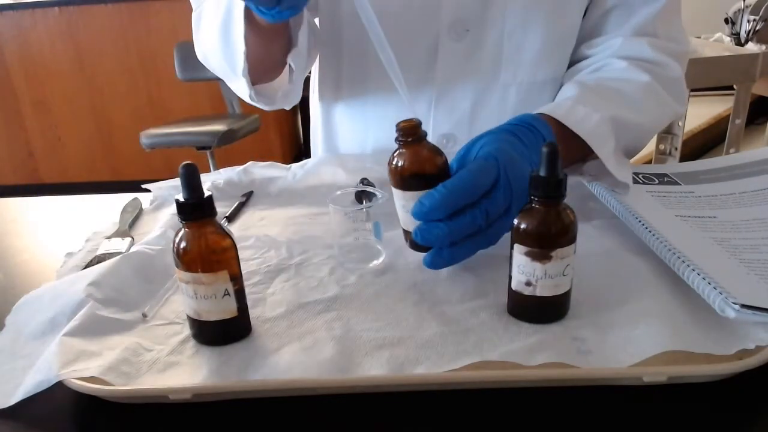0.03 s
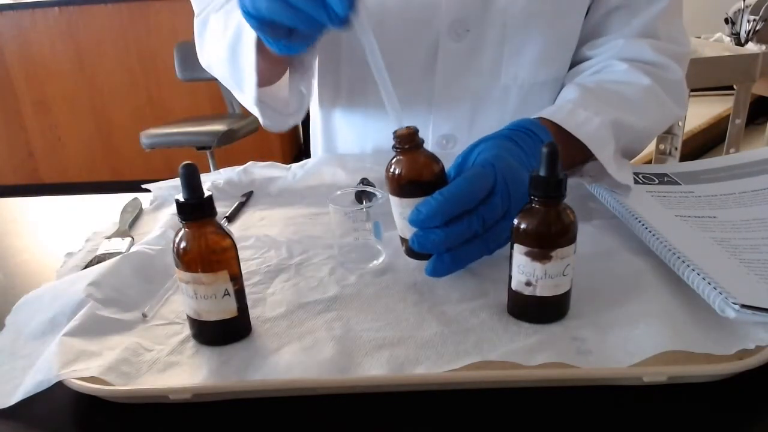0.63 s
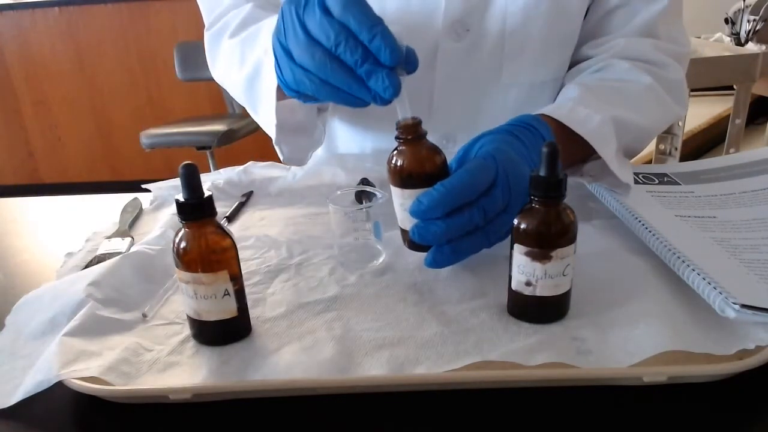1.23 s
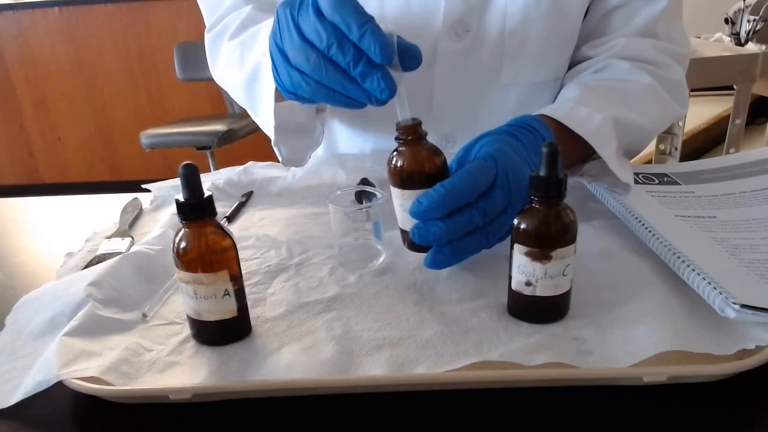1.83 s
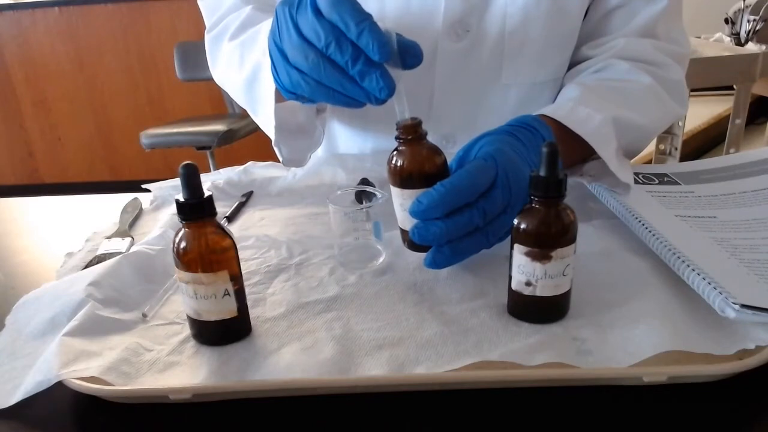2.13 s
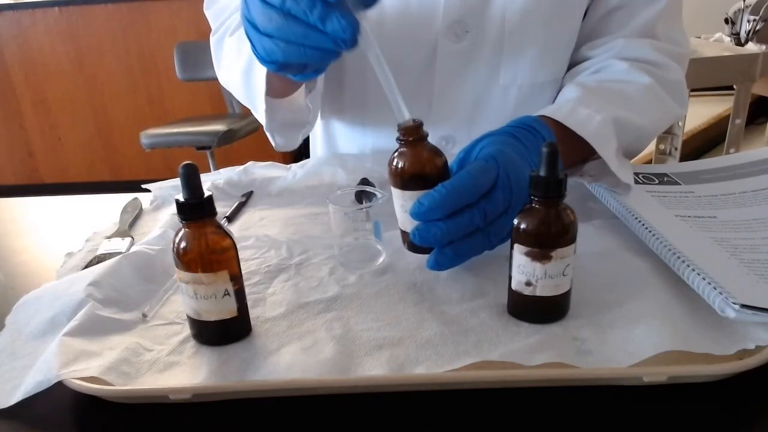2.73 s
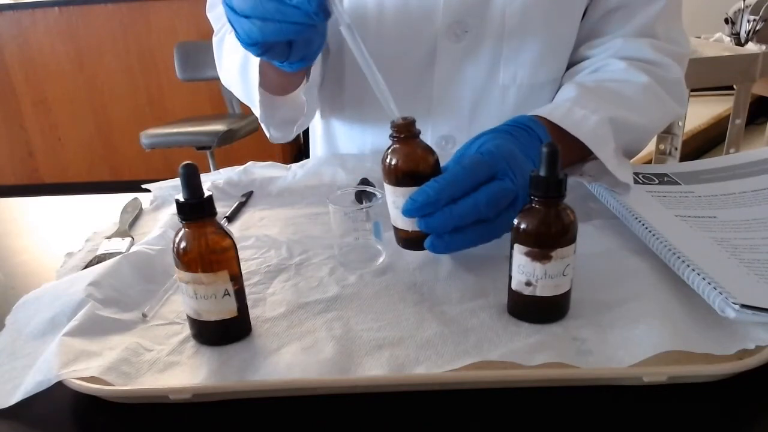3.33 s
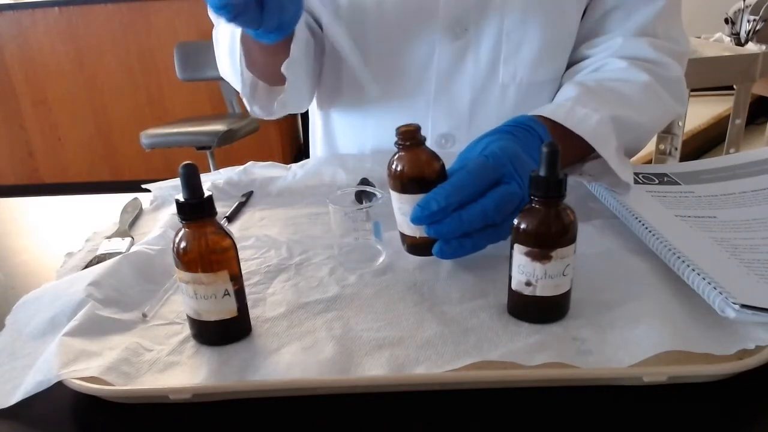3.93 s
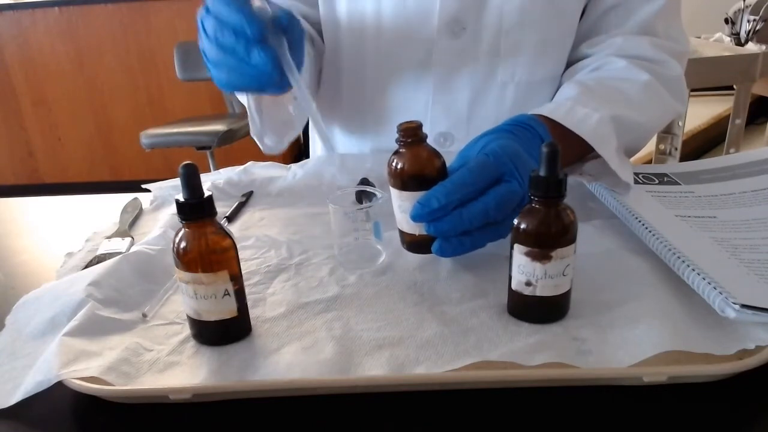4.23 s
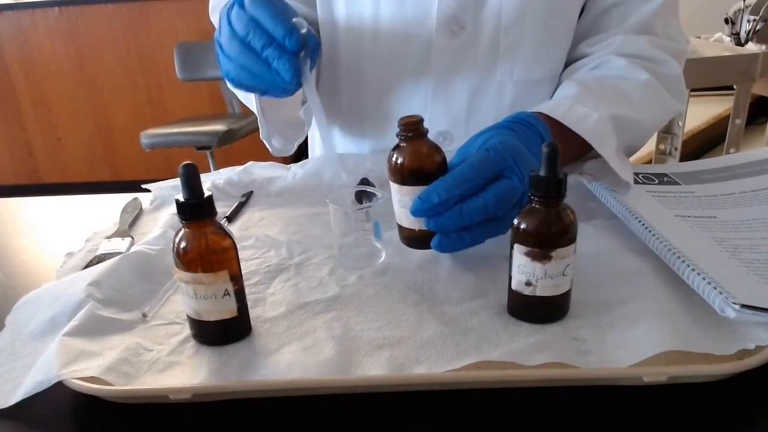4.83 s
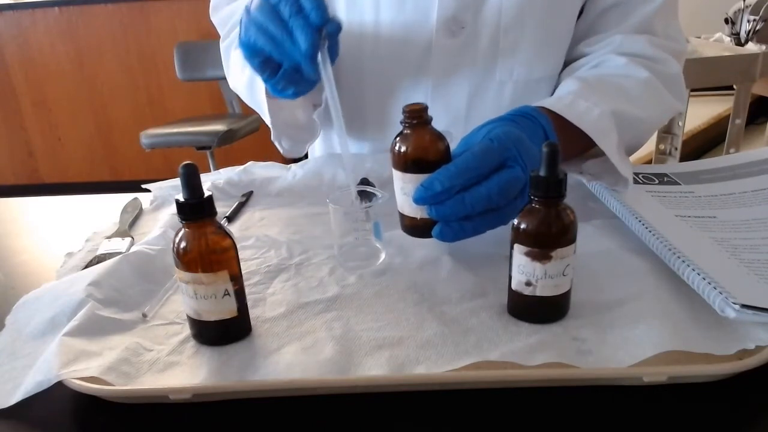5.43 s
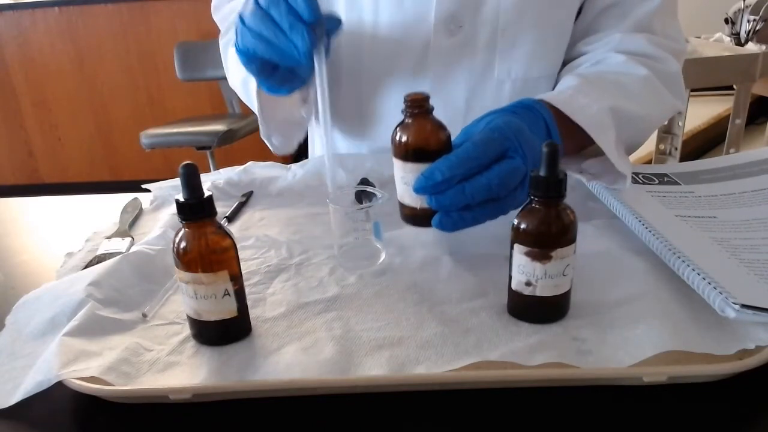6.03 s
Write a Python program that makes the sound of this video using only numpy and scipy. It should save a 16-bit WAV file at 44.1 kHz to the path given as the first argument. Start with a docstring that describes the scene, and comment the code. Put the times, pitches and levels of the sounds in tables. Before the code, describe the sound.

Ventilation rumbles steadily in a lab, with a soft rush of air. Close to the microphone, a plastic pipette makes small, dry, irregular ticks against a glass bottle and beaker, while rubber gloves and sleeves rustle faintly. A few short, hissy scrapes come from farther away and linger slightly in the room. About two thirds through, one light tap rings the glass, followed by another scrape and a few more ticks.

```python
"""Pipetting in a ventilated lab.

A gloved hand works a plastic pipette between a glass dropper bottle and a small beaker.
Ducts rumble, gloves and sleeves rustle faintly, the pipette ticks, one tap rings the glass.
Farther off something is scraped in short hissy strokes, which the room prolongs."""
import sys
import numpy as np
from scipy import signal
from scipy.fft import rfft, irfft, next_fast_len
from scipy.io import wavfile
from scipy.ndimage import map_coordinates

SR = 44100
rng = np.random.default_rng(int(sys.argv[2]) if len(sys.argv) > 2 else 0)


def generate_wav(signal):
    """Clip the signal to [-1, 1] and save it as 16-bit WAV at the path in sys.argv[1]."""
    frames = np.transpose(np.atleast_2d(signal))
    scaled = np.clip(frames, -1, 1) * 32767
    pcm = np.round(scaled).astype(np.int16)
    wavfile.write(sys.argv[1], SR, pcm)


N = 273420

# duct rumble spectrum: freq_hz, relative_db
DUCT_SPECTRUM = [(8, -24.5), (15, -9), (26, 6.5), (42, -2.5), (52, -9.5), (68, -0.5), (85, -3), (103, 1),
                 (148, -4.5), (168, -1.5), (210, -7), (255, -13), (290, -13.5), (420, -62)]
# rushing air spectrum: freq_hz, relative_db
AIR_SPECTRUM = [(150, -5), (300, 1.5), (360, 3), (420, -1.5), (640, -1.5), (820, -6), (1050, -7),
                (1400, -14.5), (2000, -21.5), (2800, -29.5), (3500, -32), (4800, -39), (6200, -41.5),
                (7600, -65), (9000, -84.5)]
# duct resonances: pitch_hz, width_hz, rms_db
DUCT_MODES = [(191, 10.1, -48.5), (231.9, 9.8, -56), (325.5, 20, -54)]
# fan tones: pitch_hz, rms_db
FAN_TONES = [(477, -62.5), (806, -72)]
# glove and sleeve rubs: peak_s, length_s, relative_db
HAND_RUBS = [(.61, 0.17, -77), (1.222, 0.13, -78.5), (2.11, 0.14, -74), (2.7, 0.17, -76),
             (2.863, 0.18, -71), (2.929, .03, -73), (3.17, 0.1, -72.5), (3.517, .24, -72.5),
             (3.913, .22, -77.5), (4.682, 0.075, -77.5), (5.52, .16, -76.5)]
# rustle spectrum: freq_hz, relative_db
RUSTLE_SPECTRUM = [(600, -17.5), (1500, 1.5), (2500, 5.5), (4000, 3), (6000, -2), (8000, -5.5),
                   (9000, -31.5)]
# light strokes: start_s, length_s, relative_db, squeak_db, squeak_hz
LIGHT_STROKES = [(0.099, .03, -71, -79, 6900), (0.128, 0.024, -76, -68, 3320),
                 (0.187, 0.031, -74.5, -82, 5150), (1.613, 0.028, -73, -75, 5220),
                 (4.265, 0.029, -71.5, -82, 7000)]
# pressed strokes: start_s, length_s, rise_s, rasp_db, rasp_hz, whistle_db, whistle_hz, hiss_db, squeal_db
PRESSED_STROKES = [(1.632, 0.036, 0.011, -62.5, 1720, -71, 3270, -67.5, -69.5),
                   (2.447, 0.017, .007, -68.5, 1600, -61, 3300, -66, -81),
                   (2.464, 0.0083, .003, -56.5, 1560, -56, 3040, -61.5, -72),
                   (2.469, 0.02, .003, -63, 1560, -66, 3150, -62.5, -66),
                   (3.352, 0.017, .002, -65, 1740, -65.5, 3120, -62, -72),
                   (3.369, 0.013, .004, -65, 2210, -67, 3100, -69, -70),
                   (3.396, 0.046, .007, -73, 2210, -75, 3020, -74, -84),
                   (4.525, 0.023, .004, -58.5, 1480, -62, 3200, -60.5, -74)]
# scraped object, light touch: pitch_hz, width_hz, gain_db
SKIM_MODES = [(1640, 310, 11), (3365, 180, 5), (4200, 300, -5), (5110, 300, -2.5), (5650, 370, -8),
              (7030, 360, -4)]
# scraped object under pressure, low range: pitch_hz, width_hz, gain_db
RASP_MODES = [(2240, 440, -9)]
# scraped object under pressure, high range: pitch_hz, width_hz, gain_db
HISS_MODES = [(4000, 620, 0), (5080, 440, 1), (5700, 450, 1.5), (6340, 410, -3.5), (7020, 380, -2.5)]
# pipette contacts: start_s, level_db, pitch_hz, t60_s, crackle_relative_db
PIPETTE_TICKS = [(0.6845, -52.5, 5000, 0.0042, -22), (1.190, -62, 6100, 0.008, -19),
                 (1.197, -66, 5800, .01, -19), (1.251, -62, 6100, .007, -13), (1.259, -67, 5700, .007, -15),
                 (1.325, -50, 5550, .005, -20), (2.8385, -54, 4580, 0.013, -16),
                 (2.8723, -52, 4700, .004, -13), (2.9242, -54.5, 5970, .008, -7.5),
                 (3.0492, -53, 5500, 0.0026, -24), (3.157, -62, 4200, .011, -15),
                 (3.5135, -68, 4650, 0.012, -13), (5.015, -61.5, 6580, 0.041, -17),
                 (5.502, -61, 3900, 0.011, -16), (5.626, -61, 6570, .009, -16),
                 (5.628, -55, 4950, .015, -25), (5.647, -60, 6750, .015, -24)]
# taps on glass: start_s, level_db
GLASS_TAPS = [(4.3225, -49)]
# glass resonances: pitch_hz, gain_db, t60_s
GLASS_MODES = [(3048, -1, 0.21), (5510, 1.5, 0.028), (5700, -4, 0.017), (5850, 2, 0.011), (6700, 8, 0.0053),
               (7200, -13, 0.067)]
# lab reverberation: freq_hz, t60_s
ROOM_DECAY = [(300, 0.68), (1600, 0.82), (3000, 0.48), (6500, 0.47), (8000, 0.13)]

TOP_HZ, LEAK_DB = 7650, -19  # band limit, gain above it


def amp(db):
    """Decibels to gain."""
    return 10 ** (np.asarray(db) / 20)


def unit_rms(x):
    """Scale to rms 1."""
    return x / np.sqrt(np.mean(x ** 2) + 1e-20)


def curve(points, hz):
    """Interpolate (freq_hz, value) points on a log frequency axis."""
    f, values = np.transpose(points)
    return np.interp(np.log(hz + 1), np.log(f + 1), values)


def wobble(rate_hz):
    """Smooth random curve."""
    knots = rng.standard_normal(int(N * rate_hz / SR) + 4)
    return map_coordinates(knots, [np.arange(N) * rate_hz / SR], mode="nearest")


def filtered(x, response):
    """Apply a frequency response."""
    size = next_fast_len(N + SR // 2)
    return irfft(rfft(x, size) * response(np.fft.rfftfreq(size, 1 / SR)), size)[:N]


def noise(response):
    """Coloured noise, rms 1."""
    return unit_rms(filtered(rng.standard_normal(N), response))


def resonance(f, hz, width_hz):
    """Response of one damped mode."""
    return 1j * f * width_hz / (hz * hz - f * f + 1j * f * width_hz)


def modal_noise(modes):
    """Noise through (pitch_hz, width_hz, gain_db) resonances, rms 1."""
    return noise(lambda f: sum(amp(db) * np.abs(resonance(f, hz, width_hz)) ** 2
                               for hz, width_hz, db in modes))


def decay(t, t60_s):
    """Free decay, 60 dB in t60_s."""
    return np.exp(-np.log(1000) * t / t60_s)


def add(track, start_s, sound):
    """Mix in at start_s."""
    part = track[round(start_s * SR):][:len(sound)]
    part += sound[:len(part)]


def ventilation(duct_db, air_db, speed_drift):
    """Ducts rumble and boom, air rushes, faint fan tones wander with fan speed."""
    t = np.arange(N) / SR
    rumble = amp(duct_db) * noise(lambda f: amp(curve(DUCT_SPECTRUM, f)))
    air = amp(air_db) * noise(lambda f: amp(curve(AIR_SPECTRUM, f)))
    boom = sum(amp(db) * noise(lambda f: resonance(f, hz, 2 * width_hz) ** 2)
               for hz, width_hz, db in DUCT_MODES)
    fan_time_s = t + speed_drift * np.cumsum(wobble(rate_hz=3)) / SR
    tones = sum(amp(db) * np.sqrt(2) * np.sin(2 * np.pi * (hz * fan_time_s + rng.random()))
                for hz, db in FAN_TONES)
    return rumble + air + boom + tones


def gloves(gain_db, rest_relative_db, rise_ratio, drop_db):
    """Rubber and cloth rub: each move swells quickly, fades more slowly."""
    t = np.arange(N) / SR
    power = amp(rest_relative_db) ** 2  # hands never quite still
    for peak_s, length_s, db in HAND_RUBS:
        lengths_away = np.maximum((peak_s - t) / rise_ratio, t - peak_s) / length_s
        power = power + amp(db - drop_db * lengths_away) ** 2
    grains = amp(2.5 * wobble(rate_hz=500)) * rng.standard_normal(N)
    rustle = unit_rms(filtered(grains, lambda f: amp(curve(RUSTLE_SPECTRUM, f))))
    return amp(gain_db) * np.sqrt(power) * rustle


def stroke(start_s, length_s, rise_s, release_s=0.0036):
    """Friction envelope: ramp, hold, exponential release."""
    age_s = np.arange(N) / SR - start_s
    return np.clip(age_s / rise_s, 0, 1) * np.exp(-np.maximum(age_s - length_s, 0) / release_s)


def light_scrapes(skim_gain_db, rise_s, squeak_width_hz):
    """Light friction: soft onset, resonant noise, thin squeak."""
    out = np.zeros(N)
    skim = amp(skim_gain_db) * modal_noise(SKIM_MODES)
    for start_s, length_s, db, squeak_db, squeak_hz in LIGHT_STROKES:
        squeak = modal_noise([(squeak_hz, squeak_width_hz, 0)])
        out += stroke(start_s, length_s, rise_s) * (amp(db) * skim + amp(squeak_db) * squeak)
    return out


def pressed_scrapes(rasp_width_hz, rasp_release_s, whistle_width_hz, hiss_lag_s,
                    squeal_hz, squeal_width_hz, squeal_rise_s):
    """Pressed friction bites with rasp and whistle; hiss and squeal build as it takes hold."""
    out = np.zeros(N)
    hiss = modal_noise(HISS_MODES)
    squeal = modal_noise([(squeal_hz, squeal_width_hz, 0)])
    for (start_s, length_s, rise_s, rasp_db, rasp_hz,
         whistle_db, whistle_hz, hiss_db, squeal_db) in PRESSED_STROKES:
        rasp = modal_noise([(rasp_hz, rasp_width_hz, 0), *RASP_MODES])
        whistle = modal_noise([(whistle_hz, whistle_width_hz, 0)])
        out += stroke(start_s, length_s, rise_s, rasp_release_s) * amp(rasp_db) * rasp
        out += stroke(start_s, length_s, rise_s) * amp(whistle_db) * whistle
        out += stroke(start_s, length_s, rise_s + hiss_lag_s) * amp(hiss_db) * hiss
        out += stroke(start_s, length_s, squeal_rise_s) * amp(squeal_db) * squeal
    return out


def pipette(attack_s, crackle_t60_s, contact_gain_db, contact_hz, contact_width_hz):
    """Each contact: sharp impulse, duller crackle, one quickly damped mode."""
    rings, impulses, crackles = np.zeros((3, N))
    t = np.arange(SR // 10) / SR
    onset = 1 - np.exp(-t / attack_s)
    for start_s, db, hz, t60_s, crackle_db in PIPETTE_TICKS:
        add(rings, start_s, amp(db) * decay(t, t60_s) * onset * np.sin(2 * np.pi * hz * t))
        add(impulses, start_s, amp(db) * (t == 0))
        crackle = decay(t, crackle_t60_s) * rng.standard_normal(len(t))
        add(crackles, start_s, amp(db + crackle_db) * crackle)
    contact = impulses + filtered(crackles, lambda f: 1 / (1 + (f / TOP_HZ) ** 12))
    clicks = filtered(contact, lambda f: resonance(f, contact_hz, contact_width_hz) ** 2)
    return rings + amp(contact_gain_db) * clicks


def glass(attack_s, snap_relative_db, snap_t60_s, cutoff_hz):
    """A tap snaps and rings the glass: high modes die fast, the lowest sings on."""
    out = np.zeros(N)
    t = np.arange(SR // 2) / SR
    onset = 1 - np.exp(-t / attack_s)
    ring = sum(amp(db) * decay(t, t60_s) * np.sin(2 * np.pi * hz * t) for hz, db, t60_s in GLASS_MODES)
    for start_s, db in GLASS_TAPS:
        snap = amp(snap_relative_db) * decay(t, snap_t60_s) * rng.standard_normal(len(t))
        add(out, start_s, amp(db) * (ring + snap) * onset)
    return filtered(out, lambda f: 1 / (1 + (f / cutoff_hz) ** 10))


def room(x):
    """Lab reverberation: diffuse tail, shorter in the treble, drawn afresh for each short block."""
    out = np.zeros(N)
    block = SR // 10
    for start in range(0, N, block):
        hz, t, spectra = signal.stft(rng.standard_normal(SR // 2), SR, nperseg=256)
        tail = signal.istft(spectra * decay(t, curve(ROOM_DECAY, hz)[:, None]), SR)[1]
        add(out, start / SR, signal.fftconvolve(x[start:start + block], tail / np.linalg.norm(tail)))
    return out


def scene():
    """Ventilation under near, almost dry handling and far, reverberant scrapes."""
    hum = ventilation(duct_db=-37.5, air_db=-47.5, speed_drift=0.002)
    near = gloves(gain_db=4, rest_relative_db=-80.5, rise_ratio=0.77, drop_db=16.5)
    far = light_scrapes(skim_gain_db=6.5, rise_s=0.013, squeak_width_hz=140)
    far += pressed_scrapes(rasp_width_hz=360, rasp_release_s=0.039, whistle_width_hz=310,
                           hiss_lag_s=0.004, squeal_hz=5720, squeal_width_hz=450, squeal_rise_s=0.012)
    near += pipette(attack_s=0.00016, crackle_t60_s=0.016,
                    contact_gain_db=17.5, contact_hz=5000, contact_width_hz=3600)
    near += glass(attack_s=0.00033, snap_relative_db=-4, snap_t60_s=0.014, cutoff_hz=11000)
    return (hum + near + far + amp(-21) * room(near) + amp(-4) * room(far))[None]


def record(dry):
    """Steep low-pass; a trace of the sharpest snaps leaks above it."""
    lowpass = signal.butter(16, TOP_HZ, fs=SR, output="sos")
    band = signal.sosfiltfilt(lowpass, dry, padlen=SR // 10)
    return band + amp(LEAK_DB) * (dry - band)


dry = scene()
out = record(dry)
generate_wav(out)
```